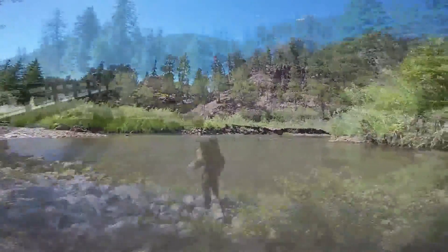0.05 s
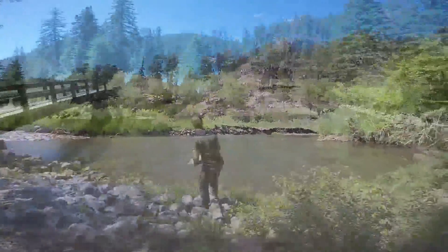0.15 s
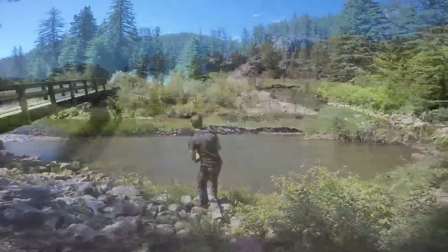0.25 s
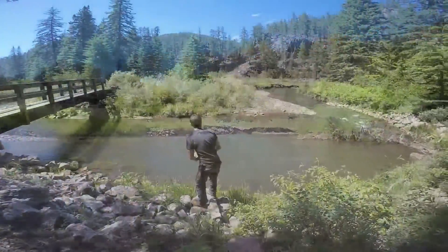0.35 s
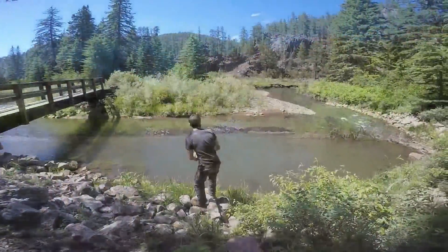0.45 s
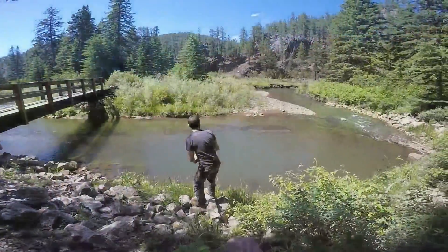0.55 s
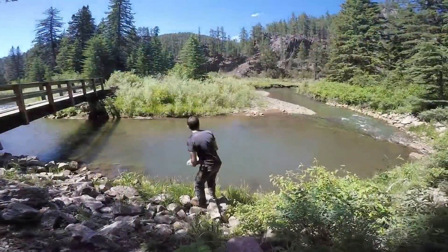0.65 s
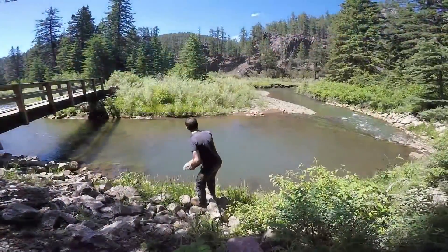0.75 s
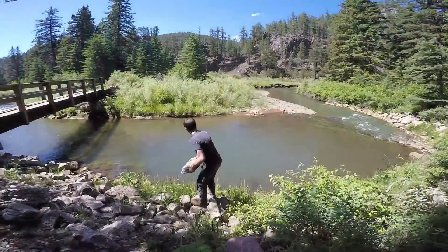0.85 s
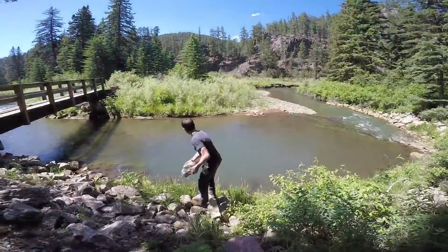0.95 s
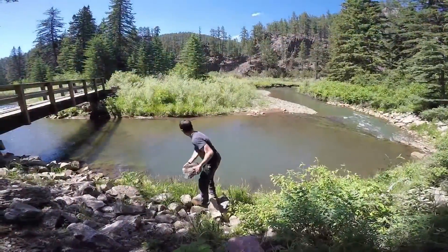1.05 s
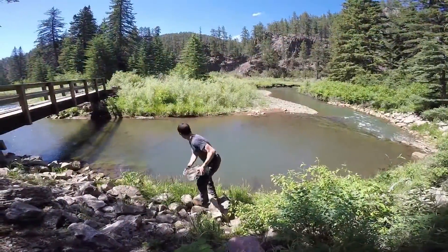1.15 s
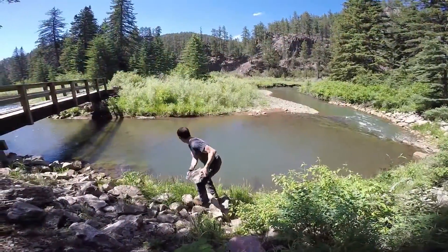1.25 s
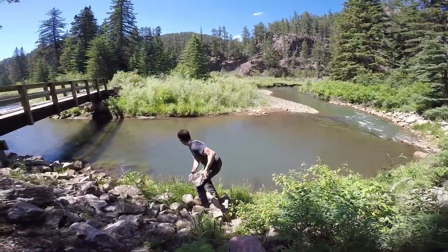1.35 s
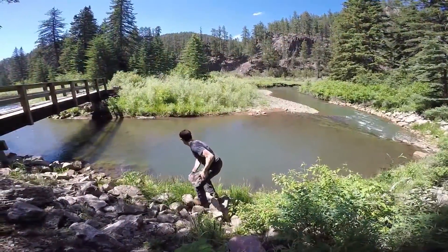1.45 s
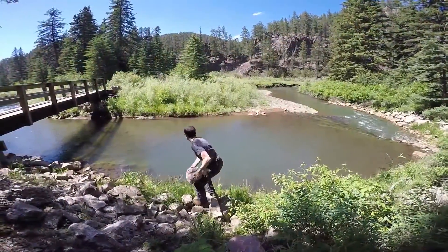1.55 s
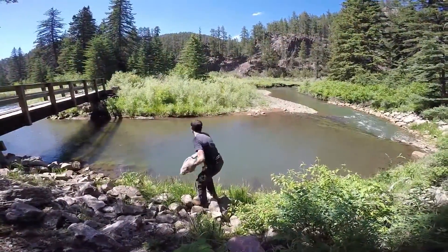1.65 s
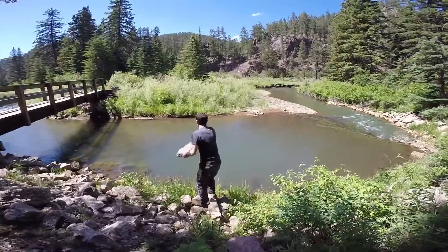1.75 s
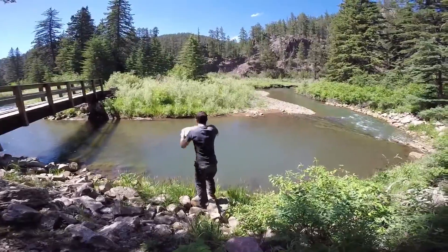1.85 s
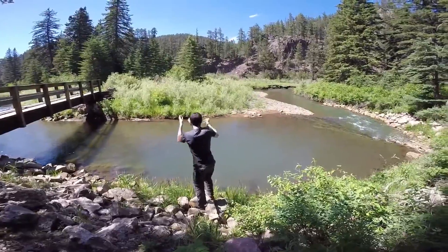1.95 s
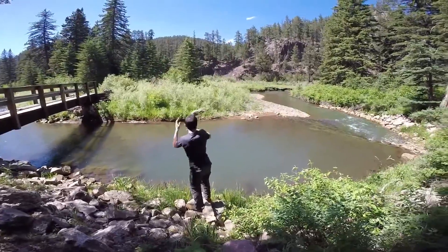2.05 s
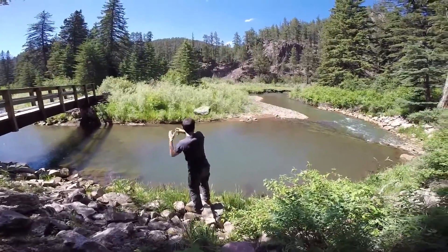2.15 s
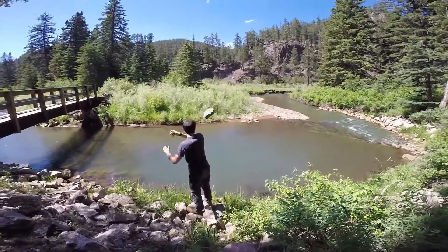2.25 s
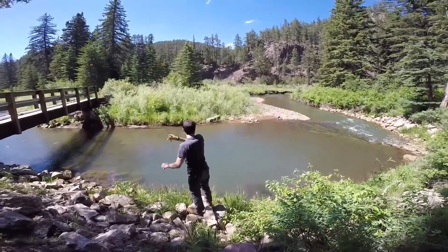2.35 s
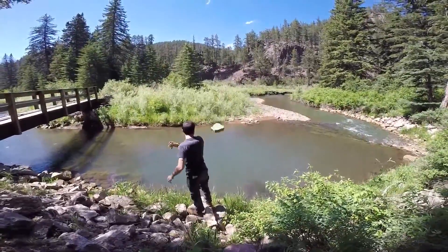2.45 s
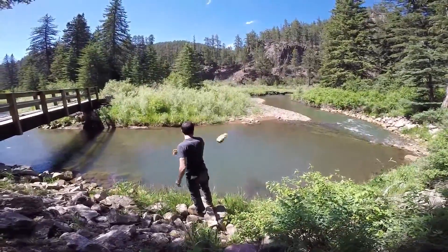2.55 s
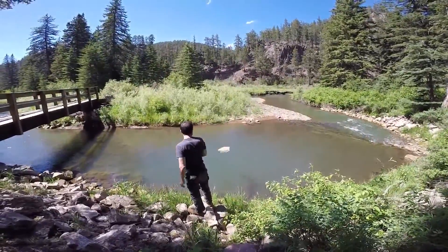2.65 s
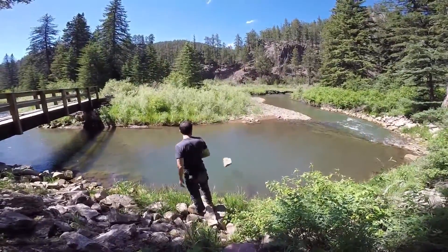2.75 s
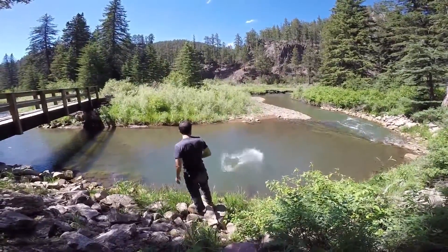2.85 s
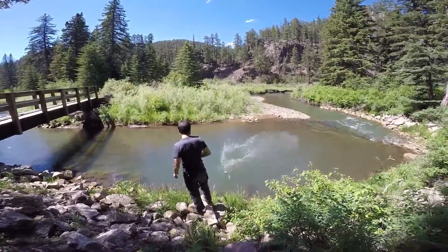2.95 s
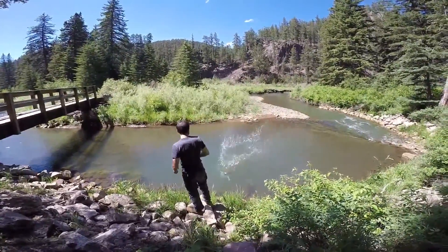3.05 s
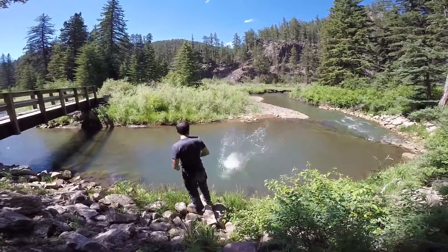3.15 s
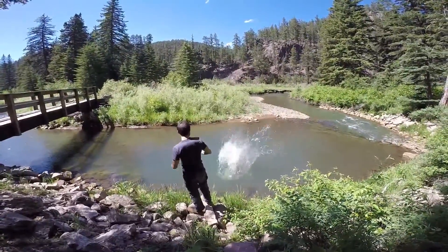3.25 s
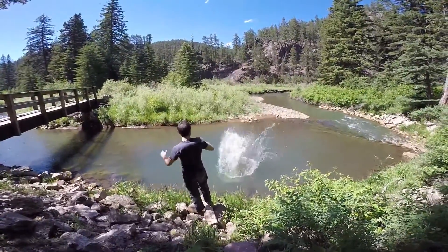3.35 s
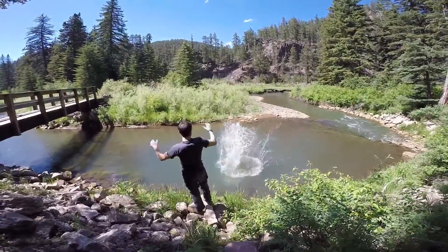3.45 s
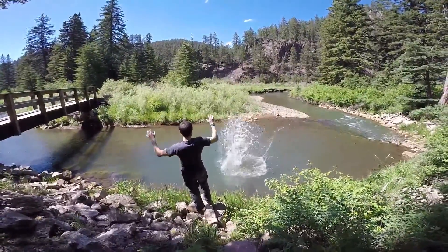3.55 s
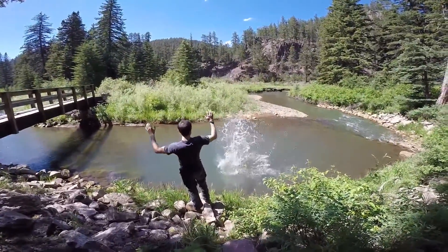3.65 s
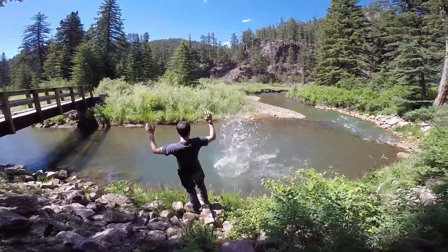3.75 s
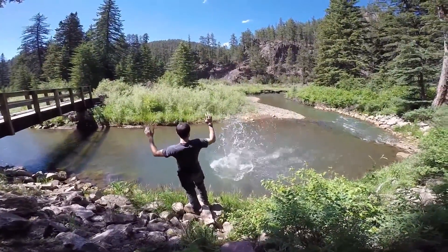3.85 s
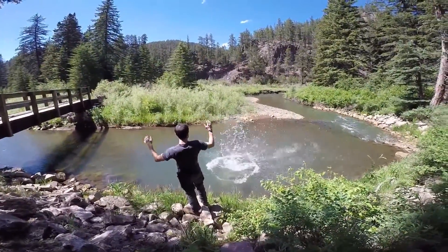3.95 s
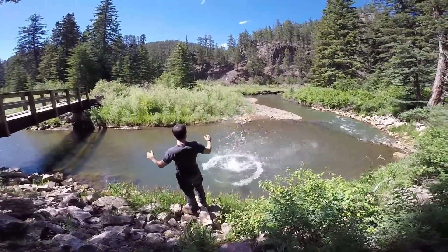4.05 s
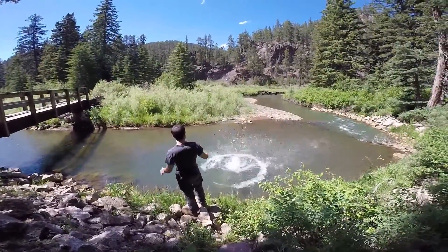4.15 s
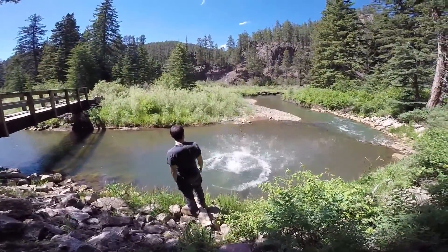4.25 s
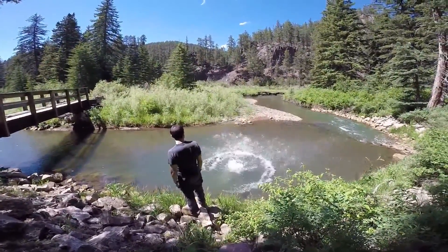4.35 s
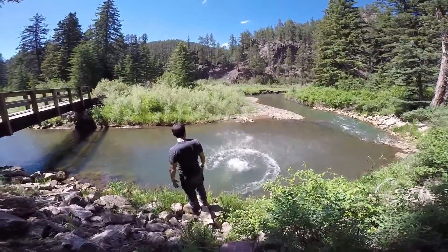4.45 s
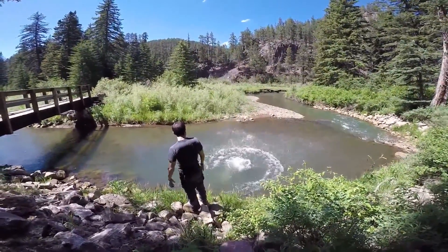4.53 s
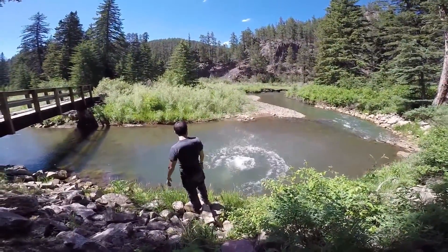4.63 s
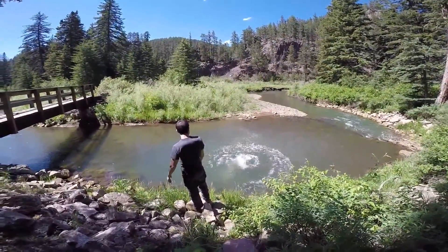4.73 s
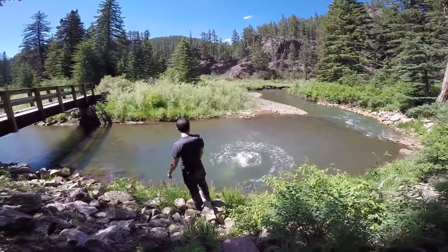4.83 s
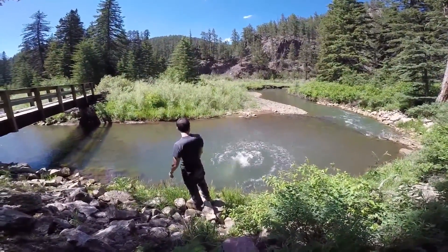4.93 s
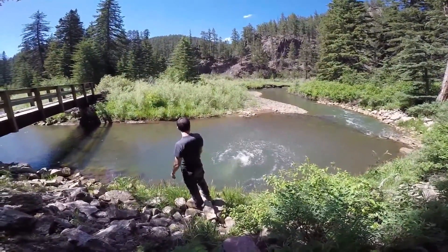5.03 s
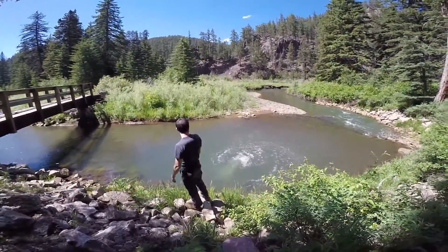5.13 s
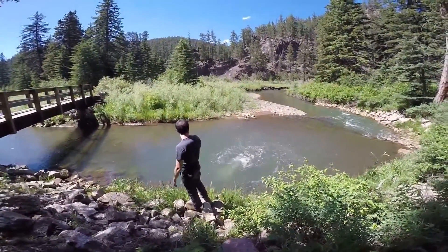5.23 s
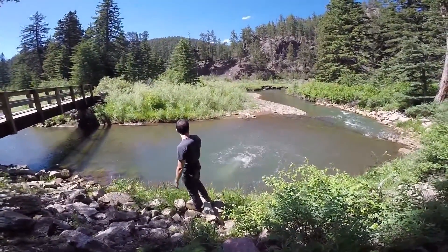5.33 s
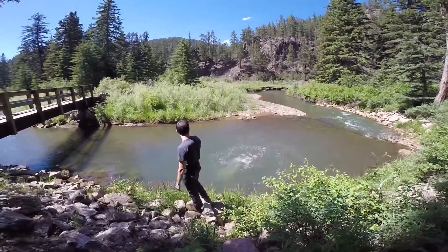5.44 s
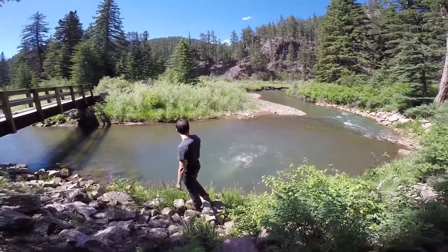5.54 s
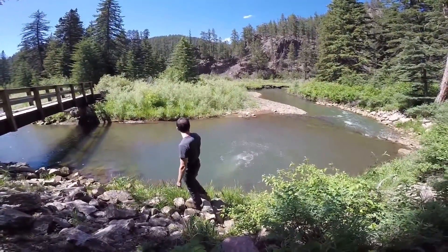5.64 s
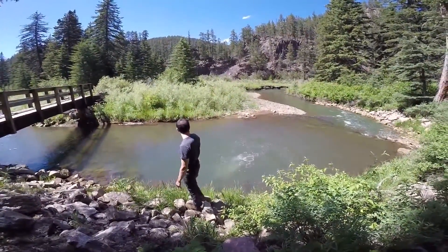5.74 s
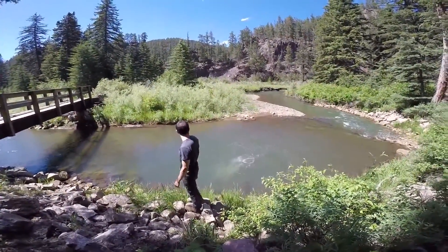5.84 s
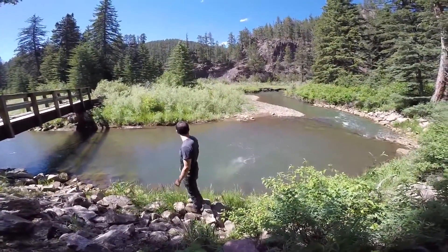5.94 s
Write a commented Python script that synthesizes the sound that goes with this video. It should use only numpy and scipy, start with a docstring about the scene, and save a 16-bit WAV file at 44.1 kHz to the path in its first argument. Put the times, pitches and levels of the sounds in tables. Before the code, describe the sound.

Outdoors by a creek, a soft bubbling wash fades in while low wind thumps against a microphone close to the water. A heavy stone hits with a sharp crack and flat slap, then a very loud, deep gulp follows a moment later. Thrown water showers back in splats, patter and hiss, thinning to near drips before the creek surges slightly at the end.

```python
"""A creek fades in and runs on as a bubbling wash, while wind rumbles as shaped noise in gusts.
Near 2.9 s a heavy stone slaps the pool in short noise bursts; near 3.2 s its air cavity shuts
with a deep gulp, the gliding tone of a pulsating air pocket. Thrown water then rains back as
drop impacts and ringing bubbles, with splats of noise from large clots. Near drops plink and tick
as small noisy rings until about 5.1 s, and the creek surges just before the end."""
import sys
import numpy as np
from scipy import signal
from scipy.fft import rfft, irfft
from scipy.io import wavfile
from scipy.ndimage import uniform_filter1d

SR = 44100
rng = np.random.default_rng(int(sys.argv[2]) if len(sys.argv) > 2 else 0)


def to_wav(sig):
    """Store sig (one row per channel, or 1-D mono) as 16-bit WAV at the path in sys.argv[1].

    Samples outside -1..1 are clipped; the rate is SR.
    """
    pcm = np.clip(np.atleast_2d(sig), -1, 1) * 32767
    pcm = np.round(pcm).astype(np.int16)
    wavfile.write(sys.argv[1], SR, pcm.T)  # frames by channels


N = 264159
T = np.arange(N) / SR  # time of every sample, in seconds

# Sound colours, giving the relative strength at each pitch: (f/Hz, level/dB)
# the running creek
CREEK_COLOUR = [(60, -5), (150, -8.5), (290, -1.5), (450, 0), (720, -7.5), (1000, -4), (1450, -2.5),
                (1720, -10.5), (2150, -6.5), (2900, -14), (3900, -12.5), (4700, -17.5), (11000, -29.5),
                (15500, -33)]
# wind rumble on the microphone
WIND_COLOUR = [(12, -10.5), (28, 6), (48, 0), (70, -12.5), (95, -24), (140, -37.5), (250, -58),
               (700, -61.5)]
# thrown water landing
SPLASH_COLOUR = [(47, -24), (80, 0.5), (248, 2.5), (338, 0), (386, 3), (718, -5.5), (1120, 2), (1950, -5),
                 (2270, -10), (3320, -7.5), (5640, -10), (7050, -15), (10300, -16), (14600, -24),
                 (16000, -33)]
# first touch of the stone on the water
CRACK = [(300, -15), (1500, -0.5), (2500, -8), (3600, 2), (4800, -4.5), (6000, -0.5), (8000, -12.5),
         (12000, -14.5), (16000, -21)]
# a thin sharp click
SNAP = [(1000, -12), (4000, -4), (14000, 1), (16000, -3)]
# the flat face of the stone landing
SLAP = [(60, 0), (250, -3), (600, -31), (850, 5), (1150, 2), (1600, 3), (2600, -10), (4500, -8),
        (8000, -31), (16000, -40)]
# water churned by the stone and the closing cavity
CHURN = [(40, 10.5), (150, 4), (330, 0), (470, -9), (620, -5), (900, -6), (1700, -8), (2600, -12),
         (4500, -14.5), (8000, -26.5), (16000, -38)]

# Long gusts, before their flutter: (start t/s, length t/s, level/dB)
GUSTS = [(0.0, 0.47, -45.5), (1.617, 0.93, -49.5), (3.297, 0.2, -48), (3.887, 0.47, -52.5),
         (5.04, 0.13, -52), (5.37, .62, -48.5)]
# Short buffets of wind: (peak t/s, level/dB)
BUFFETS = [(.04, -42), (.145, -34.5), (1.635, -47), (1.755, -37), (1.96, -46), (2.25, -43), (2.5, -45.5),
           (3.01, -49), (3.66, -43), (5.395, -34.5), (5.62, -41), (5.95, -39)]
# Showers of thrown water, with the levels at their start, before clumping:
# (start t/s, length t/s, rise t/s, 60 dB decay t/s,
#  lumps level/dB, drops level/dB, spray level/dB, mist level/dB)
# In order: the first sheet, the jet breaking up, the column raining back, stragglers
SHOWERS = [ (3.049, 0.012, 0.041, 0.59, -48.5, -44, -45.5, -67),
           (3.279, 0.25, .08, 3.3, -39.5, -44, -42.5, -53.5),
           (4.029, 0.31, 0.13, 0.75, -38, -36, -36.5, -48.5),
           (4.548, 0.026, 0.062, 1.1, -49, -48, -44.5, -66)]
# Large clots of water landing with a splat: (peak t/s, level/dB)
CLOTS = [(3.634, -36), (4.305, -37), (4.399, -40), (4.707, -42), (4.856, -39.5)]
# Single near drops: (start t/s, plink level/dB, plink f/Hz, tick level/dB)
DRIPS = [(3.755, -28.5, 4300, -37), (3.8158, -28, 2700, -44), (4.485, -29, 2080, -48),
         (4.5135, -38, 2710, -48), (4.527, -38, 4800, -40), (4.537, -34, 2290, -48),
         (4.7437, -38, 2150, -45), (4.781, -52, 4330, -40), (4.8163, -38.5, 6560, -46),
         (4.9176, -38, 2300, -38), (4.9664, -49, 1870, -38), (5.019, -41, 3220, -40),
         (5.0344, -52, 2190, -44), (5.0534, -39, 2490, -45), (5.0714, -37.5, 1490, -41),
         (5.1353, -52, 1560, -40)]
# Big air pockets: (start t/s, starting f/Hz, peak level/dB, starting-pitch cycles per 60 dB decay)
AIR_POCKETS = [(2.878, 95, -38.5, 5), (3.161, 47, -4.5, 2.4), (3.159, 150, -23, 10), (3.163, 327, -24, 14),
               (3.163, 595, -22.5, 24), (3.18, 109, -14, 9.1), (3.187, 207, -25, 8.7),
               (3.228, 60, -25, 4.2), (3.261, 29, -26, 5.7), (3.385, 47.5, -31.5, 4.5),
               (3.99, 125, -34, 7.6), (4.856, 96, -41.5, 9)]
# Blows on the water: (peak t/s, level/dB, rise t/s, 60 dB decay t/s, colour)
# In order: first contact, a second edge, a sheet shooting out, the flat face, air dragged under,
# cavity walls folding in, its neck shutting, the jet breaking upward, a sharp click
BLOWS = [ (2.8615, -16, 0.00019, 0.0051, CRACK), (2.8634, -22.5, 0.00017, 0.0068, CRACK),
         (2.8622, -29.5, 0.0025, 0.24, CRACK), (2.8793, -20.5, 0.0052, 0.021, SLAP),
         (2.883, -36, 0.0049, 0.59, CHURN), (3.1520, -30, 0.012, 0.18, CHURN),
         (3.1680, -23, 0.0056, 0.19, CHURN), (3.187, -25.5, 0.016, 0.1, CHURN),
         (3.1878, -16, 0.000078, 0.00074, SNAP)]

# Creek: basic levels, then the extra quietness at the start, which fades away
GURGLE_DB, FIZZ_DB, HISS_DB = -49, -54, -69
FADE_IN_S, FADE_IN_DB = 0.47, -9.5
SETTLE_S, SETTLE_DB = 2.7, -2.23  # the last of the rise is slow
# One surge of the creek
SURGE_S, SURGE_RISE_S, SURGE_T60_S, SURGE_GURGLE_DB, SURGE_FIZZ_DB = 5.85, 0.1, 1.6, -47, -47
# Wind: a steady breeze under the gusts; both flutter
CALM_DB, GUST_RISE_S, GUST_T60_S, BUFFET_WIDTH_S = -60, 0.027, 0.43, 0.037
GUST_FLUTTER_DB, GUST_FLUTTER_PER_S = 2, 30
# Within a shower the heavy water weakens and the fine water grows
LUMPS_DB_PER_S, DROPS_DB_PER_S, SPRAY_DB_PER_S, MIST_DB_PER_S = -31.5, -6.5, 11.5, 13
# A light drizzle adds more spray and mist
DRIZZLE_S, DRIZZLE_LENGTH_S, DRIZZLE_RISE_S, DRIZZLE_T60_S = 3.75, 1.33, 0.033, 0.43
DRIZZLE_SPRAY_DB, DRIZZLE_SPRAY_DB_PER_S = -43.5, -15
DRIZZLE_MIST_DB, DRIZZLE_MIST_DB_PER_S = -58, 0.5
# The water comes down in uneven clumps
CLUMPS_DB, CLUMPS_PER_S = 0.9, 49
CLOT_RISE_S, CLOT_T60_S = 0.003, 0.13
TICK_HZ, TICK_SCATTER_OCT = 9100, 0.25  # middle pitch of the ticks, and their random spread
POCKET_SWELL_CYCLES, POCKET_GLIDE_OCT_PER_S = 1.2, 1.9
TOP_HZ = 15500


def undb(db):
    """Turn decibels into a gain."""
    return 10 ** (np.asarray(db) / 20)


def unit(x):
    """Scale a sound to an average (rms) strength of 1."""
    return x / np.sqrt(np.mean(x ** 2) + 1e-20)


def colour(x, points, lo_hz=0, hi_hz=SR):
    """Shape a sound by a (Hz, dB) colour, keep one band of it, and scale it to rms 1."""
    f = np.arange(N // 2 + 1) * SR / N + 1e-3  # just above zero, for the logarithm
    hz, db = np.transpose(points)
    tone = undb(np.interp(np.log(f), np.log(hz), db))
    band_loss = np.sqrt((1 + (lo_hz / f) ** 10) * (1 + (f / hi_hz) ** 10))
    return unit(irfft(rfft(x, N) * tone / band_loss, N))


def add(out, s, x):
    """Mix a short sound in at time s."""
    i = int(s * SR)
    out[i:i + len(x)] += x[:max(N - i, 0)]


def walk(rate):
    """Wander at random: levels held for 1 / rate seconds, smoothed twice, scaled to rms 1."""
    hold = int(SR / rate)
    held = rng.standard_normal(N)[np.arange(N) // hold]
    smooth = uniform_filter1d(held, hold)
    return unit(uniform_filter1d(smooth, hold))


def swell(s, length, rise, t60):
    """Rise smoothly to 1 at time s, hold for a length, then die away by 60 dB in t60."""
    attack = np.exp(-(np.minimum(T - s, 0) / rise) ** 2)
    return attack * undb(-60 * np.maximum(T - s - length, 0) / t60)


def together(gains):
    """Gain of unrelated sounds heard at once: their powers add."""
    return np.sqrt(sum(g ** 2 for g in gains))


def impacts(rate, spread_db):
    """Drop impacts are clicks at random moments: many small, a few large."""
    hits = rng.random(N) < rate / SR
    signs = rng.choice([-1, 1], N)
    sizes = undb(spread_db * np.minimum(rng.exponential(size=N), 4))
    return unit(hits * signs * sizes)


def bubbles(lo_hz, hi_hz, cycles, spread_db, count):
    """Bubbles of all sizes: each rings a few cycles and rises in pitch as it nears the surface."""
    out = np.zeros(N)
    for when, size, strength in rng.random((count, 3)):
        hz = lo_hz * (hi_hz / lo_hz) ** size
        age = np.arange(int(cycles * SR / hz) + 2) * hz / SR / cycles  # runs from 0 to about 1
        ring = np.sin(2 * np.pi * cycles * age * (1 + 0.1 * age)) * np.exp(-5 * age)
        loudness = hz * undb(spread_db * min(-np.log(strength), 4))
        add(out, when * N / SR, ring * loudness)
    return unit(out)


def creek():
    """A distant riffle: countless bubbles merge into a wash, the nearer ones gurgle through it."""
    surge = swell(SURGE_S, 0, SURGE_RISE_S, SURGE_T60_S)
    gurgle_gain = together([undb(GURGLE_DB), surge * undb(SURGE_GURGLE_DB)])
    fizz_gain = together([undb(FIZZ_DB), surge * undb(SURGE_FIZZ_DB)])

    low_bubbles = bubbles(250, 1540, cycles=9.5, spread_db=1.5, count=2500)
    high_bubbles = bubbles(1767, 6980, cycles=26, spread_db=1.5, count=3000)
    water = rng.standard_normal(N) + undb(-12.5) * low_bubbles
    froth = rng.standard_normal(N) + undb(-8.5) * high_bubbles

    gurgle = colour(water, CREEK_COLOUR, hi_hz=1570) * gurgle_gain * undb(0.23 * walk(14))
    fizz = colour(froth, CREEK_COLOUR, 1710, 9700) * fizz_gain * undb(0.12 * walk(14))
    # the finest hiss surges along with the gurgle
    hiss = colour(rng.standard_normal(N), CREEK_COLOUR, lo_hz=8200)
    hiss = hiss * gurgle_gain * undb(HISS_DB - GURGLE_DB)

    fade_in_db = FADE_IN_DB * np.maximum(1 - T / FADE_IN_S, 0)
    settle_db = SETTLE_DB * np.maximum(1 - T / SETTLE_S, 0)
    return (gurgle + fizz + hiss) * undb(fade_in_db + settle_db)


def wind():
    """Eddies buffet the microphone: low noise follows the breeze, the gusts and the buffets."""
    gusts = [undb(db) * swell(s, length, GUST_RISE_S, GUST_T60_S) for s, length, db in GUSTS]
    buffets = [undb(db) * np.exp(-((T - s) / BUFFET_WIDTH_S) ** 2) for s, db in BUFFETS]
    flutter = undb(GUST_FLUTTER_DB * walk(GUST_FLUTTER_PER_S))
    breeze = together([undb(CALM_DB)] + gusts) * flutter
    eddies = colour(rng.standard_normal(N), WIND_COLOUR)
    # even out the noise over about 0.09 s, so that the gusts set its strength
    even_eddies = eddies / np.sqrt(uniform_filter1d(eddies ** 2, size=4000))
    return even_eddies * together([breeze] + buffets)


def fall(s, length, rise, t60, db, db_per_s):
    """Strength of one fall of water, which grows or thins steadily while it lasts."""
    return swell(s, length, rise, t60) * undb(db + db_per_s * np.clip(T - s, 0, length))


def thrown_water():
    """Water rains back: lumps plop, drops patter, spray hisses, and the mist gains tiny rings."""
    trends = LUMPS_DB_PER_S, DROPS_DB_PER_S, SPRAY_DB_PER_S, MIST_DB_PER_S
    shower_gains = [
        np.array([fall(s, length, rise, t60, db, trend) for db, trend in zip(levels, trends)])
        for s, length, rise, t60, *levels in SHOWERS]
    lumps_gain, drops_gain, spray_gain, mist_gain = together(shower_gains)
    drizzle = DRIZZLE_S, DRIZZLE_LENGTH_S, DRIZZLE_RISE_S, DRIZZLE_T60_S
    drizzle_spray = fall(*drizzle, DRIZZLE_SPRAY_DB, DRIZZLE_SPRAY_DB_PER_S)
    drizzle_mist = fall(*drizzle, DRIZZLE_MIST_DB, DRIZZLE_MIST_DB_PER_S)
    spray_gain = together([spray_gain, drizzle_spray])
    mist_gain = together([mist_gain, drizzle_mist])

    rain = impacts(6000, 1.25)
    low_bubbles = bubbles(118, 764, cycles=9.9, spread_db=3, count=1000)
    plops = impacts(3000, 2.3) + undb(-13.5) * low_bubbles
    middle_bubbles = bubbles(735, 2540, cycles=36, spread_db=3.0, count=2200)
    patter = impacts(3000, 1.3) + undb(-11) * middle_bubbles
    high_bubbles = bubbles(2360, 8200, cycles=35, spread_db=-1.0, count=2500)
    spray = rain + undb(-7.5) * high_bubbles
    # later on, tiny high bubbles replace part of the mist's impacts
    tiny_bubbles = bubbles(7200, 13500, cycles=20, spread_db=4.5, count=1800)
    bubble_share = np.interp(T, [4.35, 4.8], [0.1, 0.5])
    mist = np.sqrt(1 - bubble_share) * rain + np.sqrt(bubble_share) * undb(-1.0) * tiny_bubbles

    water = colour(plops, SPLASH_COLOUR, 61, 1130) * lumps_gain
    water += colour(patter, SPLASH_COLOUR, 470, 2160) * drops_gain
    water += colour(spray, SPLASH_COLOUR, 1560, 6200) * spray_gain
    water += colour(mist, SPLASH_COLOUR, lo_hz=6900) * mist_gain
    return water * undb(CLUMPS_DB * walk(CLUMPS_PER_S))


def clots():
    """Large clots of water hit the pool, each with one short splat of noise."""
    strength = together(undb(db) * swell(s, 0, CLOT_RISE_S, CLOT_T60_S) for s, db in CLOTS)
    return strength * colour(rng.standard_normal(N), SPLASH_COLOUR)


def drips(plink_t60=0.019, tick_t60=0.013, width=0.47):
    """Near drops: noise around one pitch rings briefly and roughly, as a plink and as a tick."""
    out, t = np.zeros(N), T[:2048]
    f = np.arange(len(t) // 2 + 1) * SR / len(t)
    for s, plink_db, plink_hz, tick_db in DRIPS:
        tick_hz = TICK_HZ * 2 ** (TICK_SCATTER_OCT * rng.standard_normal())
        parts = (plink_hz, plink_db, plink_t60), (tick_hz, tick_db, tick_t60)
        for hz, db, t60 in parts:
            resonance = 1 / (1 + ((f / hz - 1) / width) ** 2)
            ring = unit(irfft(rfft(rng.standard_normal(len(t))) * resonance))
            attack = np.minimum(t / 0.00069, 1)
            add(out, s, ring * attack * undb(db - 60 * t / t60))
    return out


def air_pockets():
    """Trapped air pinches off and pulsates; a larger pocket gives a deeper and slower note."""
    out, t = np.zeros(N), T[:SR // 2]
    for s, hz, db, cycles in AIR_POCKETS:
        grow, t60 = POCKET_SWELL_CYCLES / hz, cycles / hz
        attack = np.sin(np.pi / 2 * np.minimum(t / grow * 2, 1))
        # the decay starts gently, then runs straight in decibels
        soft_age = np.hypot(np.maximum(t - grow, 0), t60 / 10) - t60 / 10
        decay = undb(-60 * soft_age / t60)
        gliding_hz = hz * 2 ** (POCKET_GLIDE_OCT_PER_S * t)
        note = np.sin(2 * np.pi * np.cumsum(gliding_hz) / SR)
        add(out, s, undb(db) * attack * decay * note)
    return out


def blows():
    """The stone and the closing cavity tear the surface: noise bursts swell and die away."""
    out = np.zeros(N)
    for s, db, rise, t60, points in BLOWS:
        burst = colour(rng.standard_normal(N), points)
        out += undb(db) * swell(s, 0, rise, t60) * burst
    return out


def scene():
    """Open air: every sound arrives direct, with no echo."""
    background = creek() + wind()
    falling_water = thrown_water() + clots() + drips()
    stone = air_pockets() + blows()
    return (background + falling_water + stone)[None]


def record(dry):
    """A steep low-pass filter removes the highest treble."""
    return signal.sosfilt(signal.ellip(8, 0.2, 80, TOP_HZ, fs=SR, output="sos"), dry)


dry = scene()
out = record(dry)
to_wav(out)
```